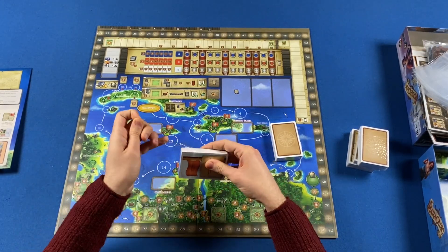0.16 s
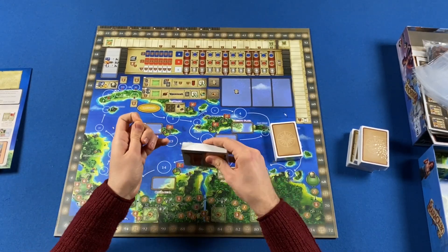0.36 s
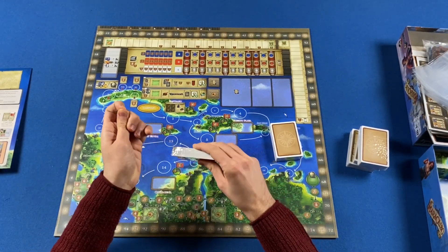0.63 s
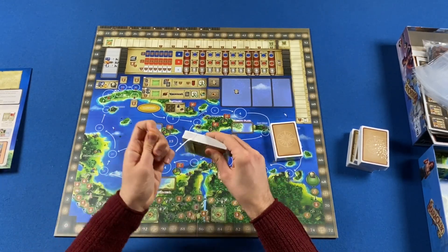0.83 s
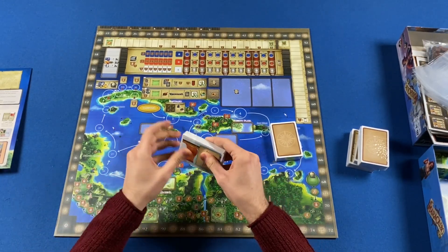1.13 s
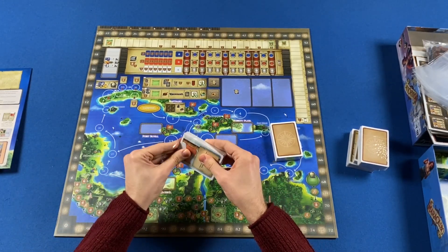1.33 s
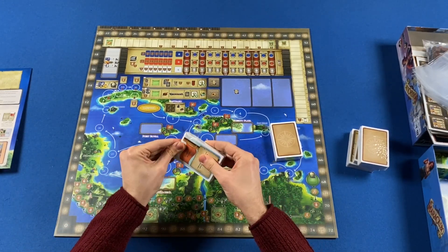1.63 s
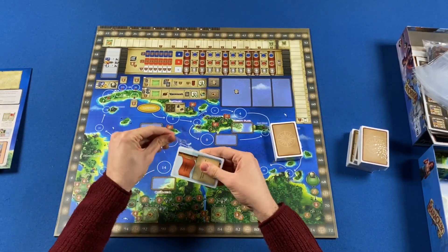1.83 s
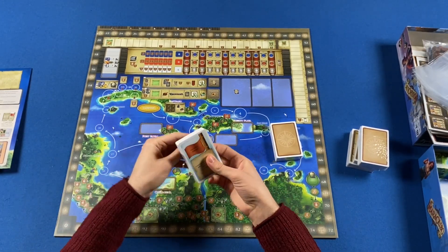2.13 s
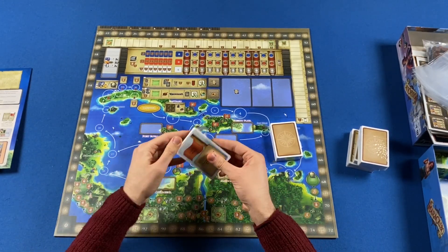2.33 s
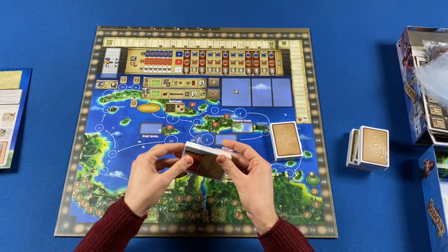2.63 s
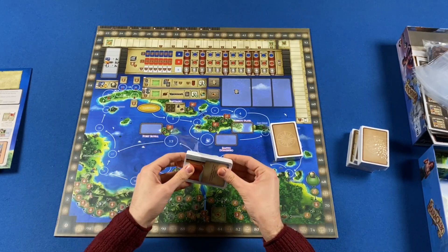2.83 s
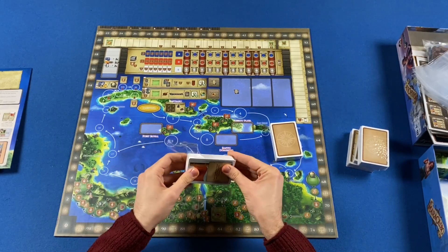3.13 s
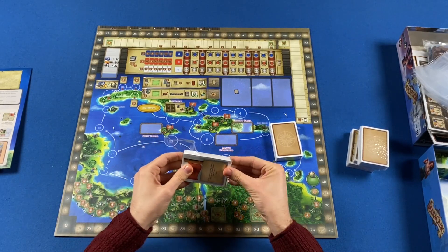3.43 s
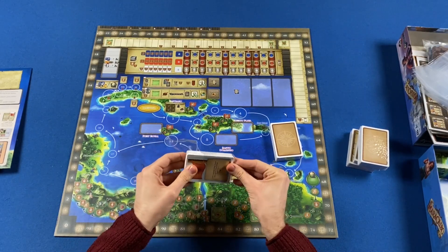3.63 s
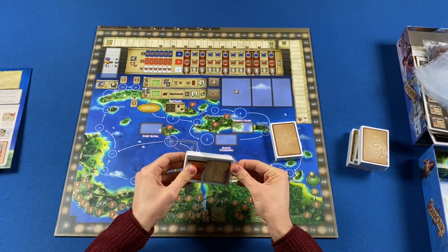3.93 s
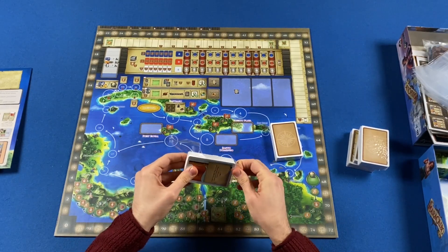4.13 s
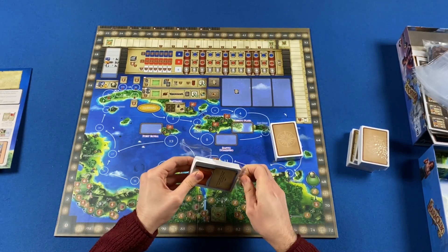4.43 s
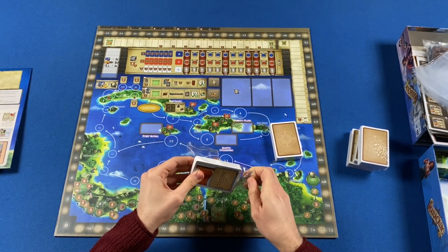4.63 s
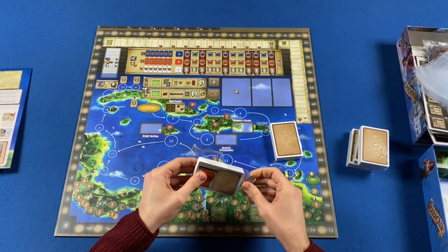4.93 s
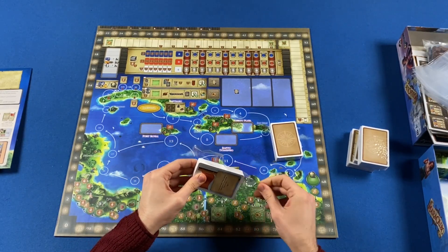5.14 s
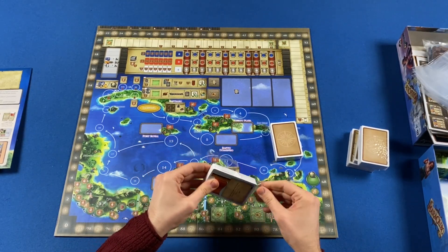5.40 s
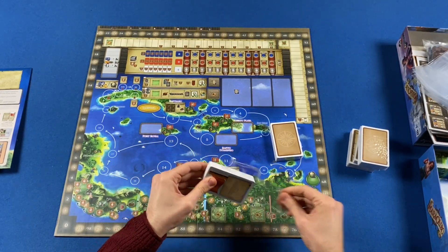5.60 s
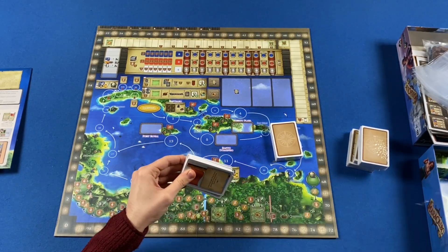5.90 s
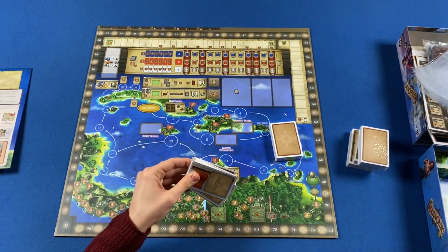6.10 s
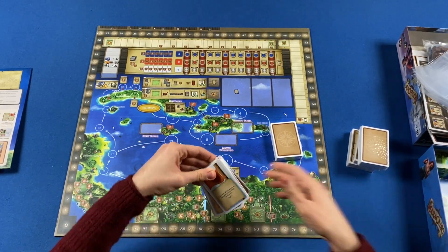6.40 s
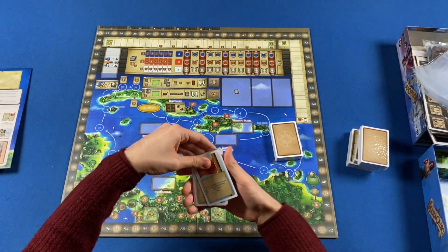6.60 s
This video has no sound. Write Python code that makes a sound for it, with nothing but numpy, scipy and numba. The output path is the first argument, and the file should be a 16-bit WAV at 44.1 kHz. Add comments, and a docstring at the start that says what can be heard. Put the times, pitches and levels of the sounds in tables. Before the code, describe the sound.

In a bare, lively room, close to the microphone, fingers work at the thin plastic film around a small deck of cards. The first second is nearly quiet: a faint tap at the start, a sharp click near 0.64 and a small crackle at 0.9. Separate ticks follow at 1.2-1.4, then bright crinkling bursts out around 1.6 and continues past 2.3. Around 2.6-2.8 soft, dull knocks on the cards accompany lighter crackle. From 3.2 to 4.2 short pulls alternate with crisp snaps. The tearing thickens from 4.5, with firm finger thuds, and peaks between 5 and 5.5 in dense, slightly lower crackling. Loose film rustles and snaps until about 6, then dwindles; a small knock and crackle comes at 6.6. Short reverberation follows every crack, over soft rumble and hiss, with a very faint low hum before 2.3.

```python
"""Shrink-wrap torn off a deck of cards

Fingers pick at the shrink-wrap on a deck of cards, tear it open and pull it off, in a bare, lively room.
The taut film buckles in single sharp snaps and in crumples, avalanches of tiny cracks that build and fade
with each pull; slack film and knocks on the deck add body. Every crack and knock is a short damped ring,
answered by a few near echoes and a diffuse reverberation, over quiet room noise and a faint low hum."""
import sys
import numpy as np
from scipy import signal
from scipy.fft import rfft, irfft, next_fast_len
from scipy.io import wavfile
from scipy.ndimage import uniform_filter1d
from numba import njit

SR = 44100
rng = np.random.default_rng(int(sys.argv[2]) if len(sys.argv) > 2 else 0)


def wav_out(sig):
    """Save sig, one row per channel (or a flat mono array), as 16-bit PCM at SR to the path in sys.argv[1]."""
    wavfile.write(sys.argv[1], SR, np.round(np.clip(np.atleast_2d(sig).T, -1, 1) * 32767).astype(np.int16))


N = 298116
TIME = np.arange(N) / SR
TOP_HZ = 16100  # upper limit of the recorder and of every ring
EDGE_HZ = 12200  # centre pitch of the sharp creases

# Crumples, one for each pinch or pull of the fingers:
# (climax [s], build-up [s], fade [s], level of the taut film [dB], slack body relative to it [dB])
CRUMPLES = [(.19, 0.046, 0.029, -67, -21), (.31, 0.017, .06, -73.5, -12),
            (.646, 0.0063, 0.0067, -55.5, -34), (.861, 0.0054, 0.043, -57, -5.5),
            (0.917, 0.0066, 0.011, -50.5, -5.5), (1.085, 0.017, .03, -72, 2), (1.27, .08, 0.1, -75, -35),
            (1.61, 0.051, 0.17, -39.5, -12), (1.725, 0.032, .035, -41, -9),
            (1.955, 0.037, 0.037, -49, -6.5), (2.05, 0.093, .11, -42.5, -13.5),
            (2.299, 0.024, 0.055, -44.5, -10), (2.605, 0.068, 0.078, -57, -8.5),
            (2.715, 0.057, 0.12, -52, -7.5), (2.885, 0.037, 0.064, -56, -11),
            (3.229, 0.029, 0.032, -46.5, -19.5), (3.45, .055, 0.088, -50, -15),
            (3.55, 0.024, 0.056, -47.5, -17), (3.76, 0.049, 0.33, -55, -33),
            (3.972, 0.018, 0.042, -43.5, -11), (4.189, .015, 0.057, -45.5, -9.5),
            (4.24, .025, 0.47, -48.5, -10.5), (4.45, 0.033, 0.055, -49.5, -1),
            (4.53, .014, 0.052, -37, -9.5), (4.62, 0.052, 0.48, -51, -1), (4.83, .04, 0.11, -44.5, -11.5),
            (4.924, 0.03, 0.044, -36, -9), (5.0, 0.1, 0.17, -42.5, -6.5), (5.30, 0.026, 0.051, -37.5, -7.5),
            (5.5, 0.089, 0.058, -31.5, -6), (5.65, 0.034, 0.082, -46, -16), (5.87, 0.094, 0.16, -54, -6),
            (5.996, 0.013, 0.03, -51.5, 0), (6.21, 0.029, 0.062, -67, -3), (6.56, 0.092, 0.17, -69, -10),
            (6.615, 0.0084, .02, -48, -5)]
# The film rings lower as it comes loose:
# (time [s], facet pitch [Hz], slack sheet pitch [Hz], crease level relative to the facets [dB])
LOOSENING = [(0, 9050, 700, 4), (1.1, 7050, 754, -2), (1.7, 7950, 1280, -10), (2.3, 7400, 1160, -3),
             (2.7, 6560, 730, -9), (3.4, 8160, 1100, -4), (4.3, 5700, 1340, -12), (5, 5860, 1155, -9),
             (5.5, 5520, 920, -4), (5.9, 4670, 980, -20), (6.7, 3940, 800, -7)]


def undb(db):
    """Decibels to gain."""
    return 10 ** (np.asarray(db) / 20)


def unit(x):
    """Scale to an energy of one."""
    return x / np.sqrt(np.sum(x ** 2) + 1e-18)


def on_log_axis(hz, points):
    """Read a table of (frequency [Hz], value) along a log-frequency axis."""
    f, value = np.transpose(points)
    return np.interp(np.log(np.maximum(hz, 1)), np.log(f), value)


def colour(x, points):
    """Filter by a table of (frequency [Hz], gain [dB])."""
    size = next_fast_len(len(x))
    hz = np.arange(size // 2 + 1) * SR / size
    gain = undb(on_log_axis(hz, points))
    return irfft(rfft(x, size) * gain, size)[:len(x)]


def blow(db):
    """Size of a blow whose level is taken over one millisecond."""
    return undb(db) * np.sqrt(SR / 1000)


@njit
def ring(start, hz, cycles, size, count):
    """Damped vibrations that swell and die within a few cycles, each with an energy of about size squared."""
    out = np.zeros(count)
    for k in range(len(start)):
        tau = cycles[k] * SR / hz[k]  # decay time in samples
        pole = np.exp(2j * np.pi * hz[k] / SR - 1 / tau)
        # a thin sheet moves no net air: this phase makes the swings either way cancel
        phase = -2 * np.arctan(2 * np.pi * cycles[k])
        z = size[k] * np.sqrt(8 / tau) * np.exp(1j * phase)
        first = max(int(start[k] * SR), 0)
        for i in range(min(int(9 * tau), count - first)):
            out[first + i] += z.imag * i / tau
            z *= pole
    return out


def facets(start, size, hz, cycles):
    """Each crack rings a facet of film, flipping it one way or the other, with its own damping."""
    side, damping = rng.random((len(start), 2)).T
    signed_size = size * np.sign(side - .5)
    return ring(start, np.clip(hz, SR / 400, TOP_HZ), cycles * (.5 + damping), signed_size, N)


def splinters(start, size, low_hz, octaves, cycles, spread_s, count):
    """Facets from large to small crack within a few milliseconds and share the energy of one blow."""
    late, pitch = rng.random((len(start), 2, count)).transpose(1, 0, 2)
    # one random pitch in each equal step of the range
    steps = (np.arange(count) + pitch) / count
    hz = np.reshape(low_hz, (-1, 1)) * 2 ** (np.reshape(octaves, (-1, 1)) * steps)
    when = start[:, None] + spread_s * late ** 2  # squaring crowds them towards the start
    sizes = np.repeat(size / np.sqrt(count), count)
    rings = np.repeat(np.broadcast_to(cycles, start.shape), count)
    return facets(when.ravel(), sizes, hz.ravel(), rings)


def air(level_db=-65.5):
    """Smooth room noise: white noise shaped into a low rumble and thin hiss."""
    # spectrum of the steady room noise: (frequency [Hz], relative density [dB])
    spectrum = [(25, -21), (38, -9), (53, 1), (90, -3), (145, -6), (250, -8), (400, -10), (600, -13.5),
                (1000, -17.5), (3000, -21), (8000, -29), (12000, -30), (15000, -32.5)]
    noise = colour(rng.standard_normal(N), spectrum)
    return unit(noise) * np.sqrt(N) * undb(level_db)


def hum(waver_db=2, count=60):
    """A faint low sine that comes and goes, gliding in pitch and wavering in level."""
    # course of the hum: (time [s], pitch [Hz], level before the waver [dB])
    course = [(.3, 181.6, -85), (.65, 174.3, -71.5), (.9, 179, -95), (1.4, 192, -81), (1.7, 180.5, -65.5),
              (1.85, 175.8, -73), (2, 178.7, -69.5), (2.2, 177.4, -80)]
    s, hz, db = np.transpose(course)
    waver = np.interp(TIME, np.linspace(0, TIME[-1], count), rng.standard_normal(count))
    phase = 2 * np.pi * np.cumsum(np.interp(TIME, s, hz)) / SR
    return np.sqrt(2) * np.sin(phase) * undb(np.interp(TIME, s, db) + waver_db * waver)


def knocks(octave_cycles=0.73, spread_s=0.00417):
    """A fingertip lands on the stack of cards: a few dull thuds, the closer in pitch the longer they ring."""
    # fingers knock and drag on the deck: (time [s], level [dB], centre pitch [Hz], ring length [cycles])
    touches = [(.059, -43.5, 850, 0.65), (.917, -44, 870, .4), (2.614, -40, 503, 1.2),
               (2.641, -43.5, 536, 1.1), (2.70, -43.5, 697, 1.1), (2.76, -50, 720, 1.04),
               (3.971, -45, 1000, 0.63), (4.481, -31.5, 950, .6), (4.532, -27.5, 938, 0.82),
               (4.928, -34.5, 950, 0.59), (5.407, -37, 800, .6), (5.469, -28, 1430, .7),
               (6.613, -43, 785, 0.54), (6.68, -46, 1140, .6)]
    start, db, hz, cycles = np.array(touches, float).T
    octaves = octave_cycles / cycles
    low_hz = hz * 2 ** (-octaves / 2)
    return splinters(start, blow(db), low_hz, octaves, cycles, spread_s, count=5)


def snaps(ring_cycles=0.58, purer_per_db=0.03, ring_db=-3.5, splinter_db=-2.0, splinter_share=0.41, body_db=-5):
    """A buckle rings at its own pitch, splinters and shakes the slack sheet; less splintering rings purer."""
    # loudest single buckles: (time [s], level [dB], ring pitch [Hz], splintering: edge relative to level [dB])
    buckles = [(.0595, -48.5, 2430, 1.5), (.0605, -47, 7500, 4), (.638, -27.5, 6400, -13.5),
               (.645, -32.5, 8700, 2), (.9165, -42.5, 2270, -3), (.919, -38.5, 7640, -2),
               (1.2013, -49.5, 7300, 7.5), (1.2367, -43.5, 5300, 4), (1.2574, -44, 5600, -5),
               (1.2724, -38.5, 5230, -7), (1.2776, -29, 4330, -17), (1.3153, -42.5, 5300, 5.5),
               (1.378, -39, 5500, -0.5), (1.5026, -39.5, 5240, -5), (1.5832, -31, 4500, -8),
               (1.595, -27.5, 2970, -14), (1.6188, -34.5, 4630, 3), (1.6952, -29, 2020, -9),
               (1.7222, -30.5, 7600, 7.5), (1.7289, -30, 6100, 5.5), (1.912, -50.5, 7500, 13.5),
               (1.9505, -32, 4870, -1.5), (1.993, -33.5, 6160, -5), (2.0336, -24.5, 5300, -20),
               (2.0652, -32, 4560, -5), (2.6029, -35.5, 5940, -2), (2.8028, -39, 2200, -13),
               (2.9126, -40.5, 6450, -7), (3.126, -41, 7300, -13), (3.196, -41, 4040, 0),
               (3.2025, -37.5, 5430, -13), (3.2126, -29, 5740, -12), (3.233, -36.5, 2060, -9),
               (3.294, -47, 2100, -4), (3.3984, -35, 5850, -5), (3.4457, -34, 7440, -8),
               (3.5325, -40, 4900, -1), (3.648, -31.5, 2200, -18), (3.6497, -33, 4030, -16),
               (3.6991, -45, 6900, -3), (3.735, -26.5, 3750, -19), (3.7528, -28, 3970, -12),
               (3.9054, -40.5, 5600, 1.5), (3.96, -34, 4100, 0.5), (4.154, -37, 3280, -5),
               (4.186, -35.5, 7800, -3), (4.2324, -33.5, 4680, 0), (4.28, -32.5, 5520, -5),
               (4.3585, -32.5, 4050, -1), (4.47, -34, 5600, -4), (4.4798, -28.5, 2500, -4),
               (4.5159, -24.5, 5900, -4), (4.5214, -27, 4500, -1.5), (4.6539, -34, 2370, -2),
               (4.7792, -40, 7300, 8.5), (4.8006, -37, 4700, -6), (4.84, -31, 7600, -0.5),
               (4.8809, -31.5, 5960, 4), (4.9746, -31, 7140, 7), (4.9938, -21.5, 5570, -18),
               (5.0307, -29.5, 4240, -7), (5.116, -28, 5800, 1.5), (5.28, -29, 3070, -3),
               (5.3102, -32.5, 8100, 8.5), (5.4245, -29, 2400, -13), (5.4308, -26.5, 3600, -7),
               (5.4624, -30.5, 3570, 5), (5.5802, -34.5, 4100, 8.5), (5.6597, -30, 5700, -1),
               (5.7903, -33.5, 5300, -7), (5.8142, -34.5, 7700, -5), (5.849, -34.5, 7650, 1),
               (5.8598, -29, 7900, -11), (5.885, -31.5, 7340, -4), (5.9886, -35.5, 2540, -3),
               (6.13, -52, 7050, -1), (6.614, -47, 2660, -4)]
    start, db, hz, edge = np.array(buckles, float).T
    climax, _, _, _, slack = np.transpose(CRUMPLES)
    main_cycles = ring_cycles * np.exp(-purer_per_db * edge)
    main = ring(start, hz, main_cycles, blow(db + ring_db), N)
    # film splinters reach from below the main ring up to 11.4 kHz
    low_hz = 0.66 * hz
    octaves = np.log2(11400 / low_hz)
    film_size = blow(db + splinter_db + splinter_share * edge)
    film = splinters(start, film_size, low_hz, octaves, 0.46, .0014, count=5)
    edges = splinters(start, blow(db + edge), 9380, 0.55, 0.45, 0.0014, count=3)
    # the slack sheet follows the slackness of the crumples around the snap
    sheet_size = blow(db + np.interp(start, climax, slack) + body_db)
    sheet = splinters(start, sheet_size, 416, 2.92, 0.32, 0.00161, count=3)
    return main + film + edges + sheet


def strain(when, build_db=10, fade_db=16, settle_db=-16, settle_db_per_s=60, roundness=1.295):
    """Amplitude of the crumpling in taut and slack film: each pull builds up, gives way, fades and settles."""
    taut, loose = 0, 0
    for climax, build_s, fade_s, db, slack_db in CRUMPLES:
        before, after = np.maximum(climax - when, 0), np.maximum(when - climax, 0)
        # roundness above one makes a crumple linger near its climax
        rise = undb(-build_db * (before / build_s) ** roundness) * (before < build_s)
        fade = undb(-fade_db * (after / fade_s) ** roundness)
        # afterwards the creases keep ticking as they relax
        settling = undb(settle_db - settle_db_per_s * after)
        level = undb(db) * rise * np.maximum(fade, settling)
        taut = taut + level ** 2
        loose = loose + (level * undb(slack_db)) ** 2
    return np.sqrt(taut), np.sqrt(loose)


def crumples(scatter_db=5.0, slip_rate=150, slip_db=3.5, own_db=2.0, film_octaves=0.801, body_octaves=0.76,
             count=26000, size=150):
    """The film gives way in uneven slips, each a shower of cracks: many small ones and a few large."""
    when = (np.arange(count) + rng.random(count)) * TIME[-1] / count
    # one random strength for each slip, slip_rate of them per second
    slips = rng.standard_normal(count)[(when * slip_rate).astype(int)]
    strength = scatter_db * np.minimum(rng.exponential(size=count), 5) + slip_db * slips
    # three parts of every crack: the slack sheet (low), the taut facet (middle), the crease itself (highest)
    weight = undb(strength + own_db * rng.standard_normal((3, count)))
    # neighbouring cracks share the energy that the fingers put in
    nearby_energy = uniform_filter1d(weight ** 2, size, axis=1)
    share = weight * np.sqrt(N / count / nearby_energy)
    detune = np.clip(rng.standard_normal((3, count)), -2, 2)
    taut, loose = strain(when)
    s, *columns = np.transpose(LOOSENING)
    film_hz, body_hz, edge = (np.interp(when, s, column) for column in columns)
    # facet pitches scatter widely below a ragged ceiling
    ceiling_hz = 9000 * 2 ** (0.21 * detune[2])
    pitch = np.minimum(film_hz * 2 ** (film_octaves * detune[1]), ceiling_hz)
    sheet = facets(when, share[0] * loose, body_hz * 2 ** (body_octaves * detune[0]), 0.51)
    film = facets(when, share[1] * taut, pitch, 0.49)
    creases = facets(when, share[2] * taut * undb(edge), EDGE_HZ * 2 ** (0.3 * detune[2]), 1.1)
    return sheet + film + creases


def ticks(tick_db=7, loudest_db=-35, scatter_db=4.0, edge_db=-3, film_octaves=0.57, count=240):
    """Now and then a larger facet flips by itself and stands out of the crumpling."""
    place, chance, detune = rng.random(count), rng.standard_normal(count), rng.standard_normal(count)
    when = place * TIME[-1]
    taut, _ = strain(when)
    size = np.minimum(blow(tick_db + scatter_db * chance) * taut, blow(loudest_db))
    s, film_hz, _, _ = np.transpose(LOOSENING)
    # centred half an octave below the crumpling facets
    hz = np.interp(when, s, film_hz) * 2 ** (film_octaves * detune - .5)
    film = facets(when, size, hz, 0.48)
    creases = facets(when, size * undb(edge_db), np.full(count, EDGE_HZ), 0.74)
    return film + creases


def response(tail_db=-1.0, build_s=0.0053, count=10):
    """Direct sound, a few distinct echoes, then a diffuse tail whose highest treble dies first."""
    # first echoes from near surfaces: (delay [s], level [dB])
    echoes = [(.0010, -5.5), (.0073, -15), (.0115, -38), (.0145, -10.5), (0.02, -16)]
    # reverberation time: (frequency [Hz], time to fall 60 dB [s])
    room_t60 = [(200, 0.51), (600, 0.7), (1500, 0.62), (4000, 0.76), (8000, 0.63), (15000, 0.32)]
    t = TIME[:SR]
    hz = np.arange(SR // 2 + 1)
    noise = rfft(rng.standard_normal(SR))
    centres = np.geomspace(room_t60[0][0], room_t60[-1][0], count)
    tail = 0
    # overlapping bands of noise, each with its own decay
    for centre, share in zip(centres, np.eye(count)):
        band = irfft(noise * on_log_axis(hz, np.c_[centres, share]), SR)
        tail = tail + band * np.exp(-np.log(1000) * t / on_log_axis(centre, room_t60))
    build = 1 - np.exp(-(t / build_s) ** 2)
    out = unit(tail * build) * undb(tail_db)
    out[0] += 1  # direct sound
    for delay, db in echoes:
        jittered = abs(delay + .0003 * rng.standard_normal())
        out[int(jittered * SR)] += undb(db)
    return out


def room(dry, count=5):
    """The film keeps turning in the hands, so every 23 ms it reaches the room by the next of a few paths."""
    facing = (TIME / .023).astype(int) % count
    return sum(signal.fftconvolve(dry * (facing == k), response())[:N] for k in range(count))


def scene():
    """The wrap in the room, as the microphone colours it, over the room's own noise and the hum."""
    # microphone colour: (frequency [Hz], gain [dB])
    mic = [(100, -4), (400, -1), (800, -0.5), (1500, 1.5), (3000, 0.5), (5500, -0.5), (9600, 0.5),
           (10600, -3.5), (13200, -3.5), (14500, 8), (16000, -11)]
    wrap = snaps() + crumples() + ticks() + knocks()
    heard = colour(room(wrap), mic) * undb(0.5)
    return (heard + air() + hum())[None]


def record(dry):
    """The recorder cuts the top steeply, with an elliptic low-pass."""
    low_pass = signal.ellip(10, .2, 70, TOP_HZ, fs=SR, output="sos")
    return signal.sosfilt(low_pass, dry)


dry = scene()
out = record(dry)
wav_out(out)
```